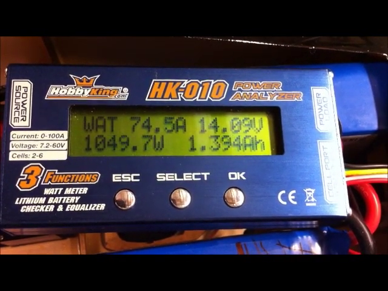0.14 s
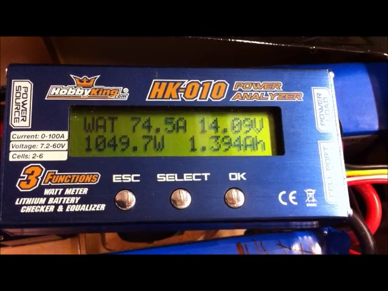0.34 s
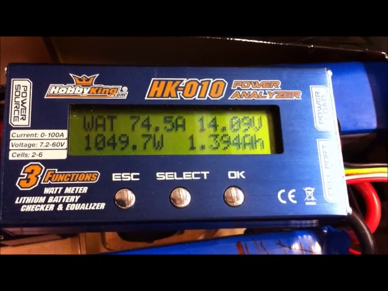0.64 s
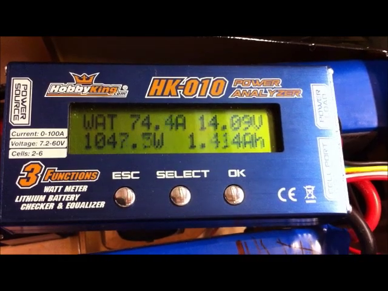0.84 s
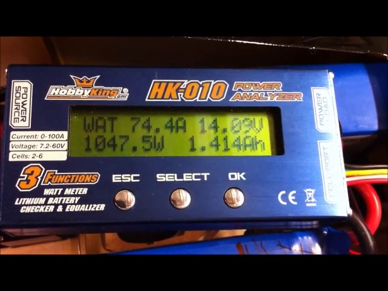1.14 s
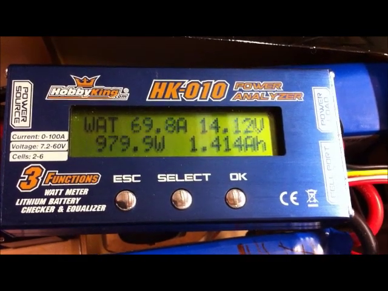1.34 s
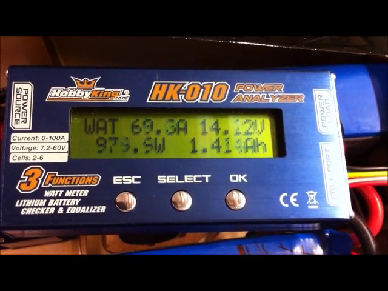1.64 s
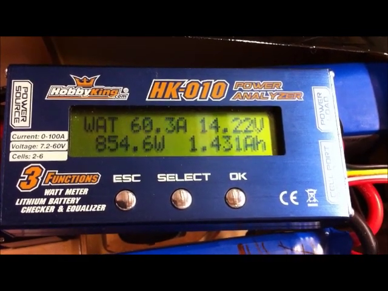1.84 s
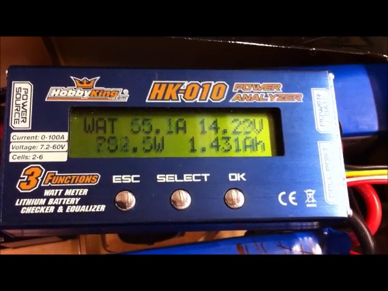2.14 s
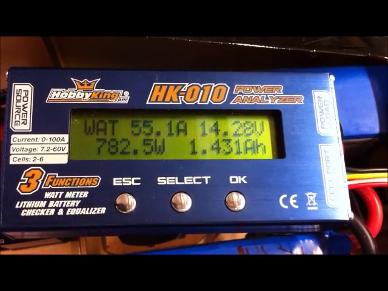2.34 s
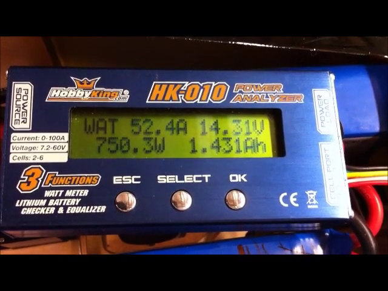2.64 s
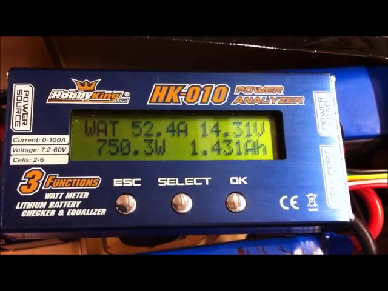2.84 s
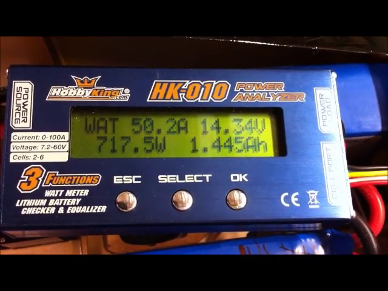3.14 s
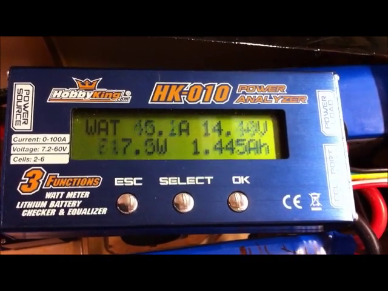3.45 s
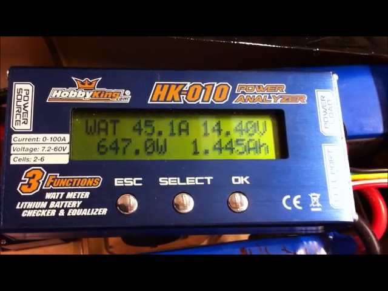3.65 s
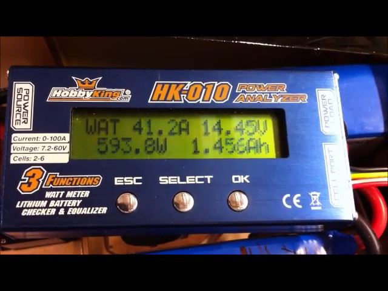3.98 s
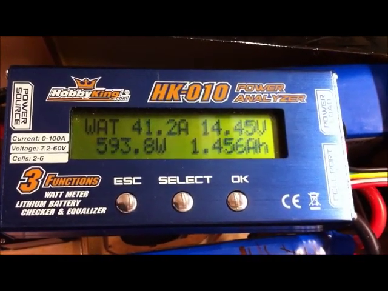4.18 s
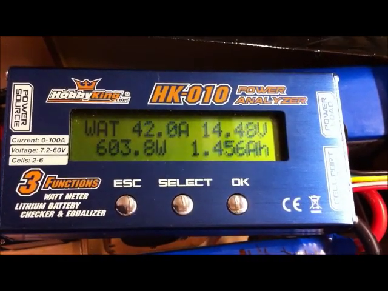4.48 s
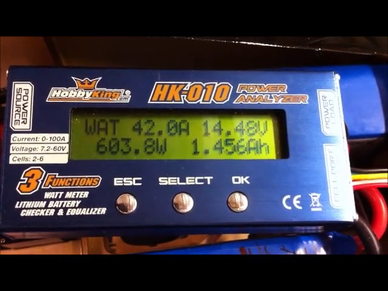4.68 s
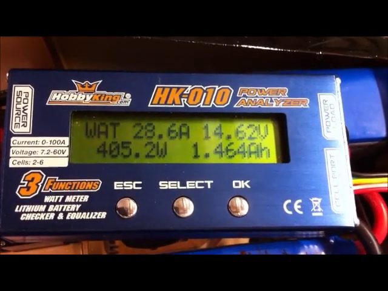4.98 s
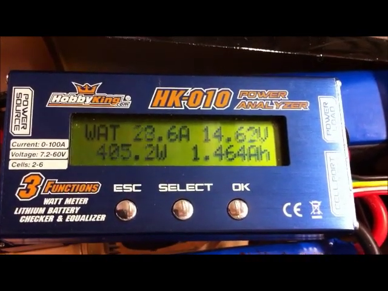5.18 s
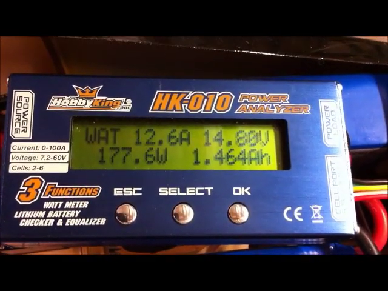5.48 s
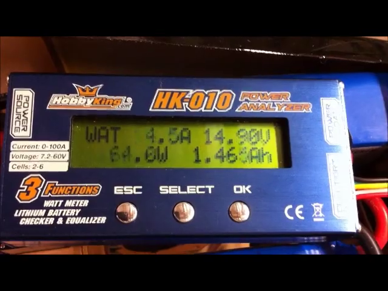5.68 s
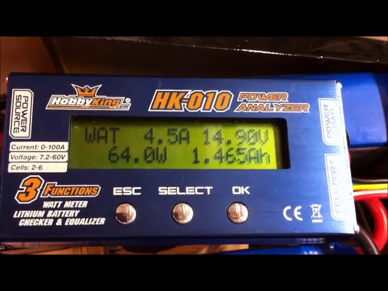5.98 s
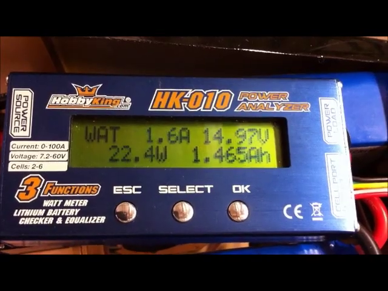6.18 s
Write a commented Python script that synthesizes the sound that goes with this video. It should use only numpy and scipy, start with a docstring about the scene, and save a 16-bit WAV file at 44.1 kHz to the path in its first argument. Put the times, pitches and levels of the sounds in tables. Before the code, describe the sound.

Close, loud and mono in a small room: a five-blade fan screams near three kilohertz with higher overtones, a low shaft hum and broad hiss. The tone wavers and dips unevenly as the throttle is eased down in steps. After a short plateau it plunges, swelling and fading through resonances, with a tiny buzzing rattle, then only a thin, falling motor whir over quiet room air.

```python
"""The whine and rush of a five-blade ducted fan on a bench, throttled down in steps, then slowing towards a stop.
Rotor unbalance and blade tones follow the shaft; the blades chop turbulence into noisy humps, and air rushes.
The stand colours the shaft's weaker orders, cogging sings late in the slowing and a loose part rattles briefly.
A mono microphone in a small, quiet room limits the peaks; both channels carry the same signal."""
import sys
import numpy as np
from scipy import signal
from scipy.fft import rfft, irfft, next_fast_len
from scipy.io import wavfile
from scipy.ndimage import uniform_filter1d, map_coordinates

SR = 44100
rng = np.random.default_rng(int(sys.argv[2]) if len(sys.argv) > 2 else 0)


def output_pcm(signal):
    """Save a mono or channel-first signal as 16-bit PCM at the path in sys.argv[1].

    Samples are clipped to [-1, 1] before scaling.
    """
    pcm = np.clip(np.atleast_2d(signal).T, -1, 1) * 32767
    wavfile.write(sys.argv[1], SR, np.round(pcm).astype(np.int16))


N = 278710
TIME_S = np.arange(N) / SR

# swells and drop-outs of a gliding tone, from resonances and standing waves: pitch_hz, half_width_hz, gain_db
PATH = [(285, 23, 8.5), (345, 23, -7), (420, 8.9, 2), (438.5, 4.6, -11.5), (494, 8, 1.5), (512, 6, -4),
        (526, 8, 3), (540.7, 8.2, -3), (569, 14, -3), (590.9, 7.85, -17.5), (667, 40, 6.5), (917, 80, 4.5),
        (1430, 90, 5.5), (1536, 29, -10.5), (1670, 150, -6), (1900, 25, -7.5), (1987, 30, 3),
        (2110, 25, -6), (2196, 50, 5), (2514, 7.4, -8.5), (2543, 6.6, -17), (2556, 4.6, -18),
        (2604, 12, -11.5), (2652, 7, -9), (2670, 3.5, -11.5), (2697, 5, -7), (2704, 2.5, -8),
        (2747, 15, -6.5), (2795, 32, -8.5), (2867, 12, -14), (2921, 19, -14.5), (2956, 6.7, 6),
        (2969, 5, -6.5), (2985, 4.2, -10), (3006, 10, -3), (3380, 160, -13.5), (3840, 110, 2.5),
        (4830, 57, 4.5), (4945, 25, -4), (5126, 25, 7), (5240, 15, -8), (5450, 18, -9.5), (5760, 280, 6),
        (6017, 15, -4.5), (6167, 110, 9.5)]


def amp(db):
    """Gain of a level in dB."""
    return 10 ** (np.asarray(db) / 20)


def unit(x):
    """x at rms 1."""
    return x / np.sqrt(np.mean(x ** 2) + 1e-20)


def along(points, hz):
    """Value at each frequency, from (Hz, value) points joined on a log frequency axis."""
    f, v = np.transpose(points)
    return np.interp(np.log(hz + 1), np.log(f + 1), v)


def wobble(rate):
    """A smooth random curve, rate knots a second."""
    knots = rng.standard_normal(int(N * rate / SR) + 4)
    return map_coordinates(knots, [np.arange(N) * rate / SR])


def filtered(x, response):
    """x times a response of frequency."""
    m = next_fast_len(N + SR // 2)
    return irfft(rfft(x, m) * response(np.fft.rfftfreq(m, 1 / SR)), m)[..., :N]


def rush(spectrum, patchy_db):
    """Coloured noise of rms 1 with time-frequency patches of random gain."""
    z = signal.stft(rng.standard_normal(N + SR // 10), nperseg=512)[2]
    field = rng.standard_normal(z.shape)
    field = uniform_filter1d(uniform_filter1d(field, 6, 0), 12, 1)
    noise = signal.istft(z * amp(patchy_db * unit(field)), nperseg=512)[1][:N]
    return unit(filtered(noise, lambda hz: amp(along(spectrum, hz))))


def by_speed(law, speed_hz):
    """Level in dB of a source at each shaft speed: steady above a knee, falling below it."""
    top_db, knee_hz, loss_db_per_octave, sharpness = law
    return top_db - loss_db_per_octave * np.log2(1 + (knee_hz / speed_hz) ** sharpness) / sharpness


def on_path(pitch_hz, bumps=PATH):
    """Gain in dB that a tone of this pitch gets from the swells and dips in a table."""
    grid = np.arange(SR // 4)
    gain_db = sum(db * np.exp(-((grid - hz) / width) ** 2) for hz, width, db in bumps)
    return np.interp(pitch_hz, grid, gain_db)


def tone(angle, speed_hz, k, waver_db, patchy_db=0):
    wave = np.sqrt(2) * np.sin(k * angle + rng.uniform(0, 2 * np.pi))
    strength_db = waver_db * (0.66 * wobble(25) + 0.58 * wobble(70)) + patchy_db * wobble(7)
    return wave * amp(strength_db) * (k * speed_hz < SR / 2.5)


def fan():
    """Tones, turbulence and airflow all follow shaft speed; gusts sway the air and the parts levelled against it."""
    hz, angle = shaft()
    # flow levels against shaft speed: top_db, knee_hz, loss_db_per_octave, sharpness
    low_flow = (-24, 442, 9.5, 5)
    jet = (-20.5, 420.5, 14.5, 4)
    gust_db = 1 * wobble(6)  # the airflow swells and sags at random
    air_db = by_speed(low_flow, hz) + gust_db
    hiss_db = by_speed(jet, hz) + gust_db

    # in a fast glide (full effect from 250 Hz per s) the upper tones flare and fade unevenly
    glide = np.clip(np.abs(np.gradient(hz)) * SR / 250, 0, 1)
    flare_db = 4.5 * glide * wobble(16)

    out = unbalance(angle, hz) + blade_tones(angle, hz, flare_db)
    out += upper_blade_tones(angle, hz, hiss_db + flare_db)
    out += chopped_turbulence(angle, hiss_db)
    out += low_air(air_db) + jet_hiss(hz, hiss_db)
    return out + shaken_stand(angle, hz, air_db) + cogging(angle, hz)


def shaft():
    """Shaft speed in turns per second and the angle in radians that it adds up to."""
    # throttle steps, then the slowing: time_s, speed_hz
    speed = [(0, 601.9), (1.07, 600.8), (1.2, 589.4), (1.35, 572.2), (1.75, 546.1), (1.8, 545.1),
             (2.02, 545.2), (2.1, 541.3), (2.41, 537.1), (2.59, 536.1), (2.68, 534.6), (2.79, 535.9),
             (2.96, 530.2), (3.06, 528.5), (3.37, 514), (3.55, 497.7), (3.63, 494.2), (4.46, 494.2),
             (4.65, 443.1), (4.81, 408.0), (5.07, 322.4), (5.21, 268.7), (5.42, 179.7), (5.51, 155.5),
             (5.66, 133.7), (5.84, 117.6), (5.9, 102.3), (6.02, 82.0), (6.11, 69.6), (6.3, 50.4)]
    s, turns_per_s = np.transpose(speed)
    hz = np.interp(TIME_S, s, turns_per_s)
    return hz, 2 * np.pi * np.cumsum(hz) / SR


def unbalance(angle, hz):
    """An off-centre rotor mass pushes once a turn and rocks the whole stand near its resonance."""
    # level against shaft speed, before resonances: top_db, knee_hz, loss_db_per_octave, sharpness
    law = (-14, 432, 25.5, 8)
    # rocking of the stand: pitch_hz, half_width_hz, gain_db
    rocking = [(235, 38, 22.5)]
    level_db = by_speed(law, hz) + on_path(hz) + on_path(hz, rocking)
    return amp(level_db) * tone(angle, hz, 1, waver_db=0.68)


def blade_tones(angle, hz, flare_db):
    """Five blades push the air five times a turn, with an octave above."""
    # levels against shaft speed, before resonances: top_db, knee_hz, loss_db_per_octave, sharpness
    blade_pass = (-9, 400.5, 10.5, 5)
    octave = (-23, 350.5, 15.5, 8.5)
    unload_s, unload_length_s, unload_db = 5.435, 0.03, -13
    blade_db = by_speed(blade_pass, hz) + on_path(5 * hz)
    # the drive lets go and the blades stop pushing air
    blade_db += unload_db * np.clip((TIME_S - unload_s) / unload_length_s, 0, 1)
    octave_db = by_speed(octave, hz) + on_path(10 * hz) + flare_db
    out = amp(blade_db) * tone(angle, hz, 5, waver_db=1.5)
    return out + amp(octave_db) * tone(angle, hz, 10, waver_db=3.0)


def upper_blade_tones(angle, hz, level_db):
    """Slower blade tips make a rounder pressure pulse, so the high tones fade faster than the hiss."""
    # higher blade tones at starting speed, before resonances: shaft_multiple, level_db (against the hiss level)
    tones = [(15, -8.5), (20, -12.5), (25, -20)]
    sharp_db = 5 * np.log2(hz / hz[0])  # 5 dB lost per octave of slowing
    out = np.zeros(N)
    for k, db in tones:
        wave = tone(angle, hz, round(k), waver_db=3.5, patchy_db=3.5)
        out += amp(db + on_path(round(k) * hz)) * wave
    return amp(level_db + sharp_db) * out


def chopped_turbulence(angle, hiss_db):
    """Eddies cut by the blades put a noisy hump round each blade tone."""
    # humps: shaft_multiple, half_width (share of shaft speed), level_db (against the hiss level)
    humps = [(5, .7, 0.5), (10, 1.1, -3.5), (15, 1.2, -7), (20, 0.84, -10), (25, 1.4, -12)]
    turns = angle / (2 * np.pi)
    out = np.zeros(N)
    for k, width, db in humps:
        # eddies last a fraction of a turn, so each hump narrows as the rotor slows
        knots = rng.standard_normal(int(turns[-1] * 4) + 9)
        eddies = map_coordinates(knots, [turns * 2 * np.clip(width, .1, 1.9)])
        out += amp(hiss_db + db) * eddies * np.sqrt(2) * np.sin(round(k) * angle)
    return out


def low_air(air_db):
    """The low rush of the airflow, as patchy coloured noise."""
    # relative spectrum: pitch_hz, density_db (per Hz)
    spectrum = [(15, -72), (25, -59.5), (102, -27.5), (228, -4), (364, 0.5), (530, -1.5), (627, -5),
                (879, 2.5), (1230, -11.5), (1400, -6), (2200, -11), (2860, -17), (4840, -120)]
    return amp(air_db + 3.5) * rush(spectrum, patchy_db=1.5)


def jet_hiss(hz, hiss_db):
    """The jet's hiss; a slow jet loses its finest eddies, and so its treble."""
    # relative spectrum at high speed: pitch_hz, density_db (per Hz)
    spectrum = [(700, -44), (1300, -12.5), (2200, 1.5), (3600, 1.5), (6000, -3), (9000, -3), (12000, -5),
                (16000, -11)]
    hiss = rush(spectrum, patchy_db=0.9)
    treble = filtered(hiss, lambda f: np.clip((f - 6500) / 6000, 0, 1))
    dulled = np.clip(.9 - hz / 300, 0, 1)
    return amp(hiss_db + 3.0) * (hiss - dulled * treble)


def shaken_stand(angle, hz, air_db):
    """Weaker shaft orders shake the stand and sweep through its resonances."""
    # orders before the resonances: shaft_multiple, level_db (against the low-air level)
    orders = [(2, -4), (3, -14), (4, -8.5), (6, -8), (7, -26), (9, -15.5), (11, -6.5), (13, -9.5),
              (14, -16.5), (15, -7.5)]
    # stand resonances: pitch_hz, width_hz, gain_db
    modes = [(238.9, 49, 6), (523, 120, -12.5), (1230, 230, 3.5), (1437, 168, 9.5), (1850, 270, 2),
             (2414, 125, 4.5), (3520, 880, 1.5)]
    shaking = np.zeros(N)
    for k, db in orders:
        shaking += amp(db) * tone(angle, hz, round(k), waver_db=2.5, patchy_db=1.5)

    def stand(f):
        """Sum of damped resonances with alternating signs."""
        total = 0
        for i, (centre, width, db) in enumerate(modes):
            damping = 1j * f * width
            total = total + (-1) ** i * amp(db) * damping / (centre * centre - f * f + damping)
        return total

    return filtered(amp(air_db) * shaking, stand)


def cogging(angle, hz):
    """The slowing motor's magnets pass its twelve teeth, singing through the motor can."""
    # levels at the start, before resonances: start_s, rise_s, teeth_db, octave_db, fade_db_per_s
    course = (5.5, 0.18, -36, -45, -5)
    # the motor can's answer: pitch_hz, half_width_hz, gain_db
    can = [(1020, 190, 7), (1410, 135, 11.5), (2400, 610, -9)]
    start_s, rise_s, teeth_db, octave_db, fade_db_per_s = course
    since = TIME_S - start_s
    fade_db = fade_db_per_s * since
    twelve_db = teeth_db + fade_db + on_path(12 * hz, PATH + can)
    double_db = octave_db + fade_db + on_path(24 * hz, PATH + can)
    uneven = angle + 0.07 * wobble(90)  # the slowing rotor judders from tooth to tooth
    out = amp(twelve_db) * tone(uneven, hz, 12, waver_db=4.0)
    out += amp(double_db) * tone(uneven, hz, 24, waver_db=5.5)
    out *= np.clip(since / rise_s, 0, 1) ** 2
    # the air gap is narrower on one side, so the pull beats once a turn
    return out * (1 + 0.24 * np.sin(angle))


def rattle():
    """A loose part knocks about once a turn near the stand's rocking resonance: ringing modes and soft cracks."""
    # knocks: start_s, level_db (relative)
    knocks = [(5.281, -10), (5.285, -0.5), (5.289, -3.5), (5.293, -10), (5.298, -6)]
    # ringing modes of the part, levels before random spread: pitch_hz, level_db, t60_s
    modes = [(408, 1.5, 0.026), (693, 3, 0.024), (1086, 2, 0.011), (1640, 2.5, 0.015), (2030, -4.5, 0.016),
             (2470, -6, 0.011)]
    out, t = np.zeros(N), np.arange(SR // 10) / SR
    for s, db in knocks:
        ring = np.zeros(len(t))
        for hz, level_db, t60_s in modes:
            ring += amp(level_db + rng.normal(0, 2) - 60 * t / t60_s) * np.sin(2 * np.pi * hz * t)
        crack = 1.6 * amp(-60 * t / 0.0074) * rng.standard_normal(len(t))
        out[round(s * SR):][:len(t)] += amp(db - 7.5) * (ring + crack)
    # soft contact dulls the treble; the bass is cut too
    return filtered(out, lambda f: 1 / (1 + (f / 3200) ** 4) / (1 + (200 / (f + 1)) ** 4))


def room(x):
    """Stirred air keeps changing the paths to the walls; each frequency of their answer dies at its own speed."""
    # decay of the walls' answer: pitch_hz, t60_s
    walls = [(200, 0.42), (2000, 0.42), (10000, 0.41)]
    # a delay of 300 samples that wanders by a few
    stirred = map_coordinates(x, [np.arange(N) - 300 + 5 * wobble(12)], mode="mirror")
    hz, t, z = signal.stft(rng.standard_normal(SR // 2), SR, nperseg=256)
    decay = amp(-60 * t / along(walls, hz)[:, None])
    tail = signal.istft(z * decay, SR, nperseg=256)[1]
    return signal.fftconvolve(stirred, tail / np.linalg.norm(tail))[:N]


def room_tone():
    """The quiet room's own background, as patchy coloured noise of rms 1."""
    # relative spectrum: pitch_hz, density_db (per Hz)
    spectrum = [(25, -23), (60, -14.5), (100, -2), (300, 8), (1000, 2), (3000, -11), (8000, -24.5),
                (16000, -27.5)]
    return rush(spectrum, patchy_db=1.5)


def scene():
    """Fan and rattle heard directly and off the walls, over the room's quiet tone."""
    direct = fan() + rattle()
    quiet = room_tone()
    mono = direct + amp(-11.0) * room(direct) + amp(-51.5) * quiet
    return np.array([mono, mono])


def record(dry):
    """Peaks clip softly; the microphone rolls off the bass; nothing passes above the band limit."""
    # microphone response: pitch_hz, gain_db
    microphone = [(20, -21.5), (60, -14.5), (120, -5), (200, -0.5), (12000, -0.5), (16000, 2)]
    top_hz = 15725
    held = dry / (1 + np.abs(dry / 1.07) ** 7) ** (1 / 7)
    return filtered(held, lambda hz: amp(along(microphone, hz)) * (hz < top_hz))


dry = scene()
out = record(dry)
output_pcm(out)
```